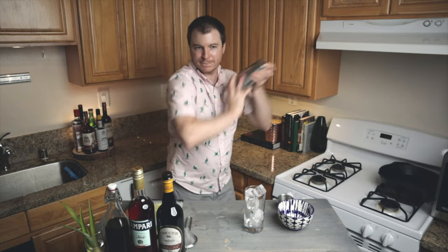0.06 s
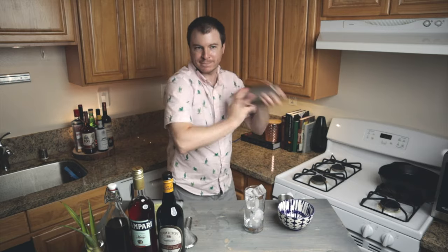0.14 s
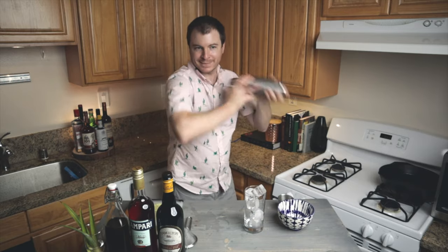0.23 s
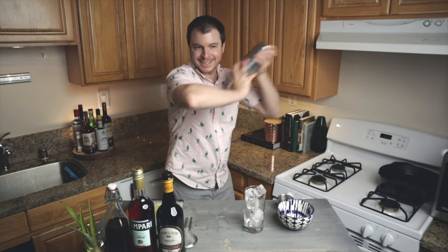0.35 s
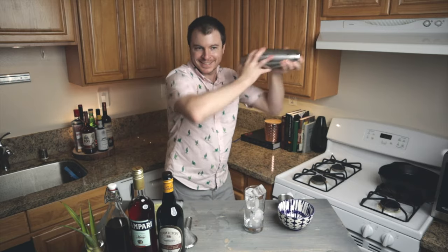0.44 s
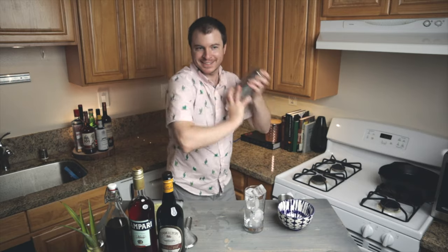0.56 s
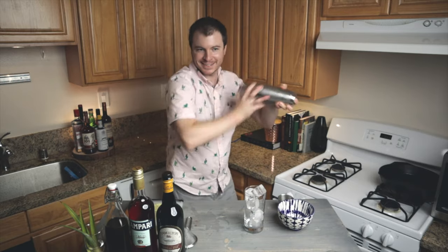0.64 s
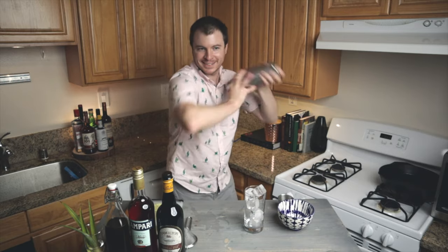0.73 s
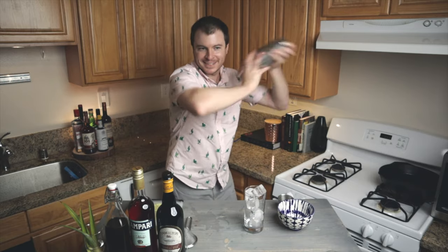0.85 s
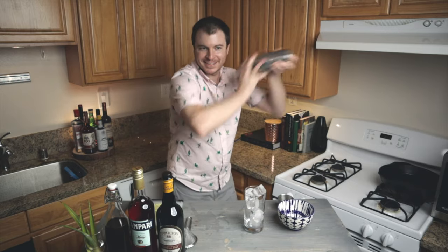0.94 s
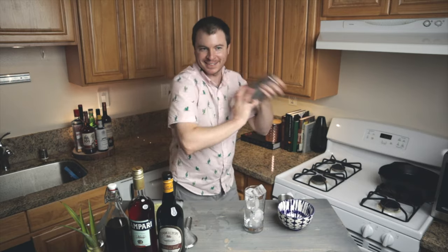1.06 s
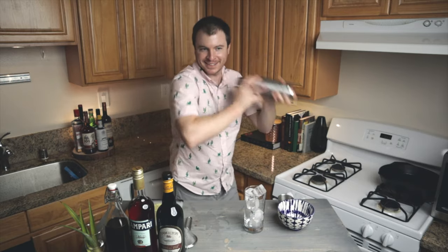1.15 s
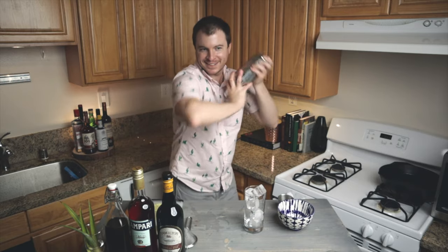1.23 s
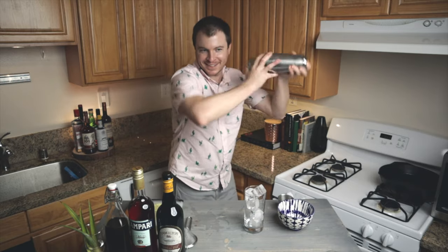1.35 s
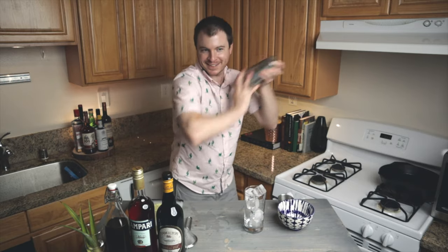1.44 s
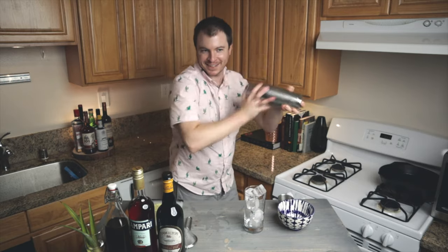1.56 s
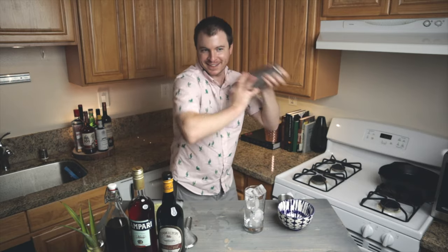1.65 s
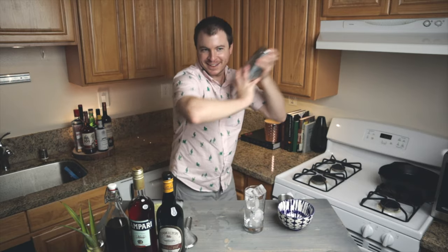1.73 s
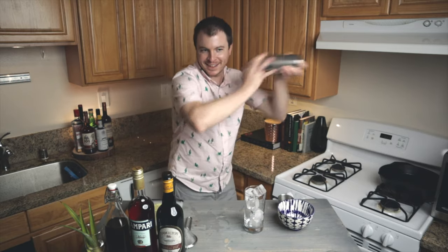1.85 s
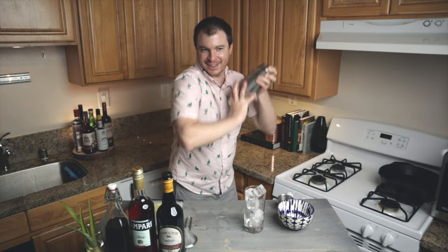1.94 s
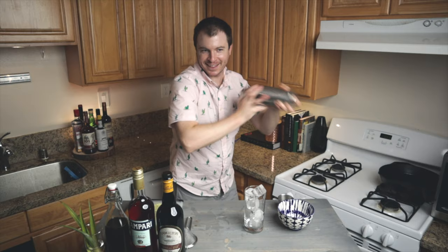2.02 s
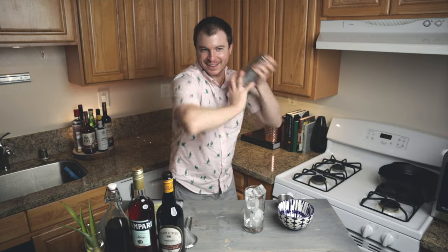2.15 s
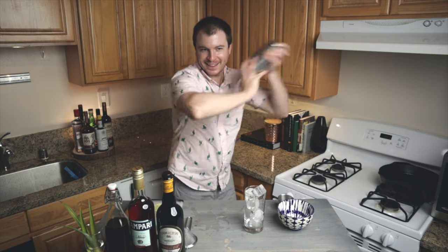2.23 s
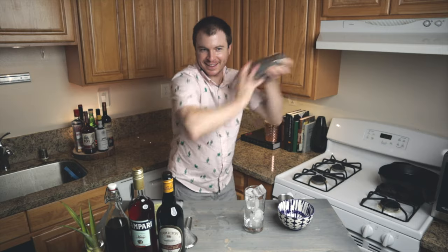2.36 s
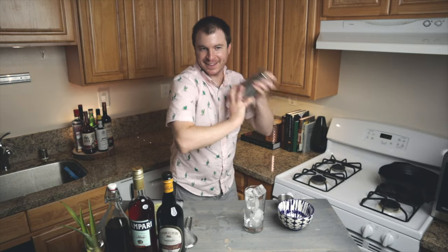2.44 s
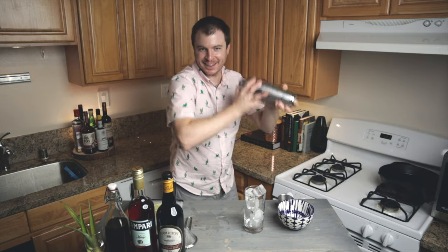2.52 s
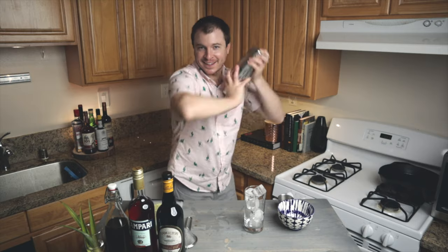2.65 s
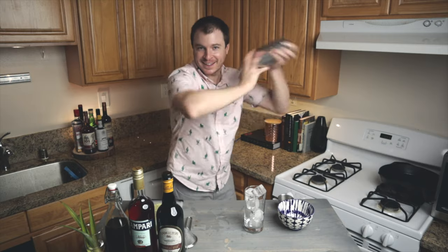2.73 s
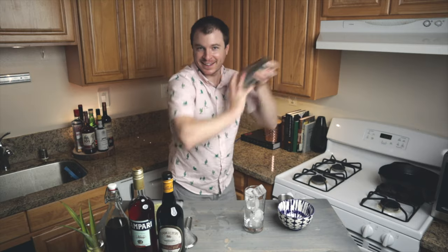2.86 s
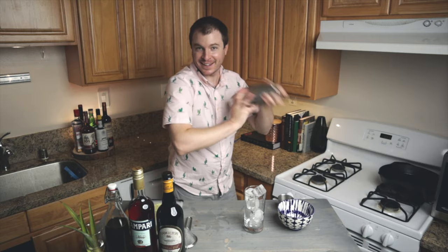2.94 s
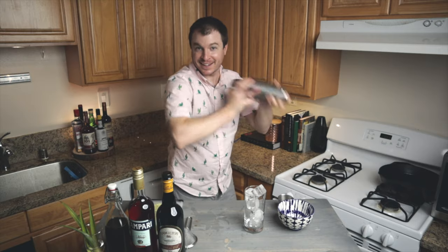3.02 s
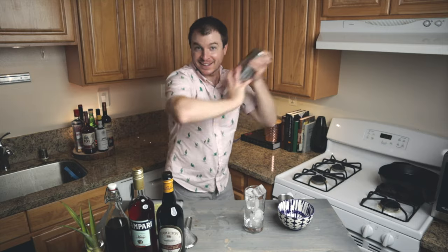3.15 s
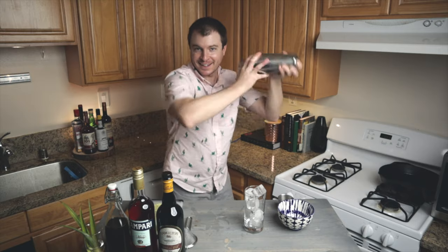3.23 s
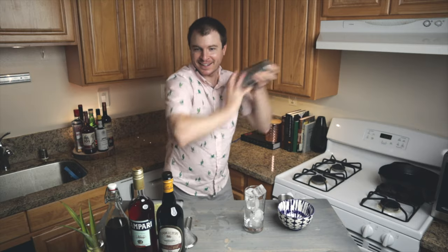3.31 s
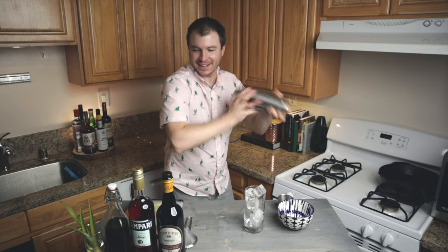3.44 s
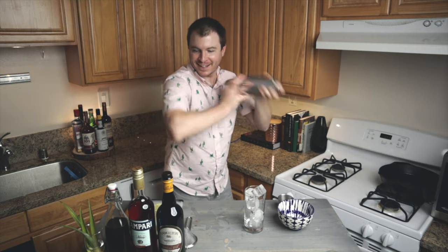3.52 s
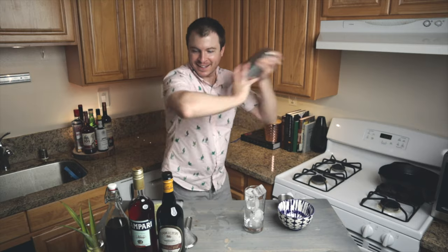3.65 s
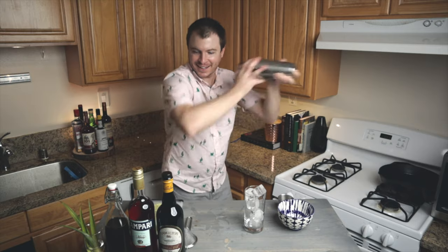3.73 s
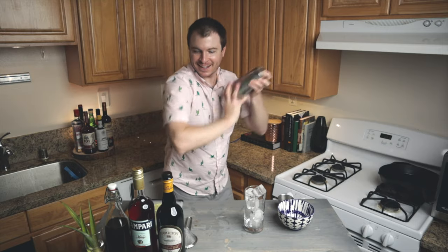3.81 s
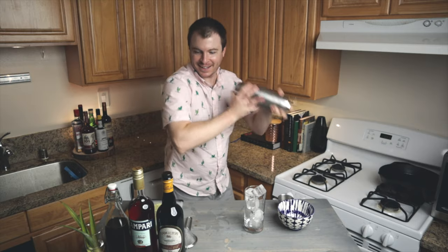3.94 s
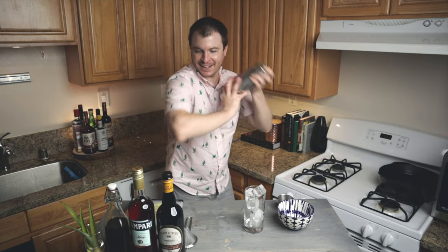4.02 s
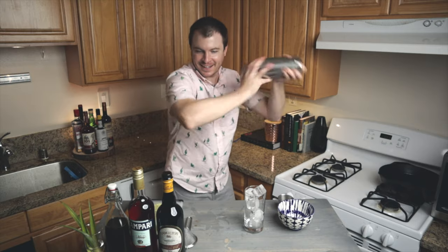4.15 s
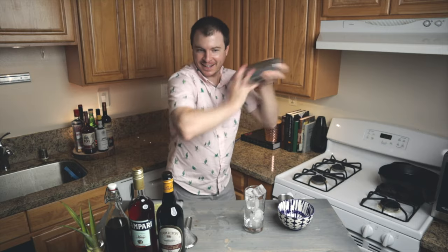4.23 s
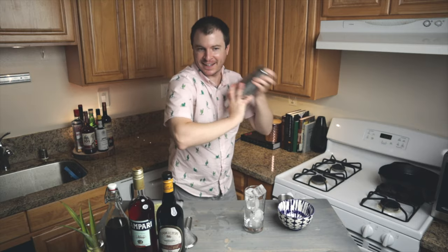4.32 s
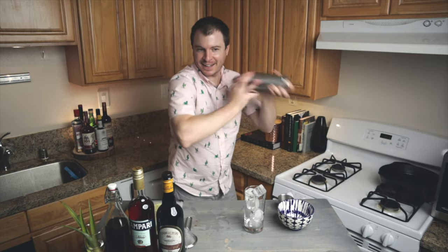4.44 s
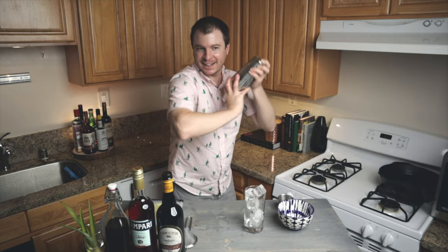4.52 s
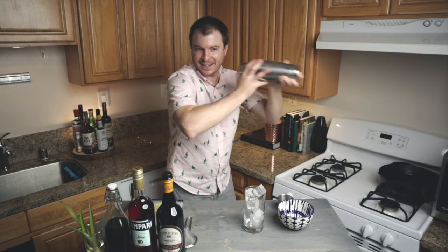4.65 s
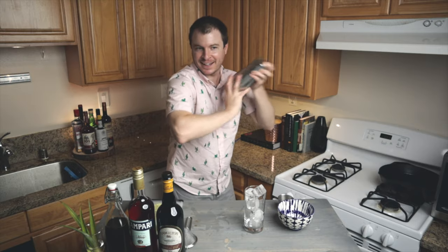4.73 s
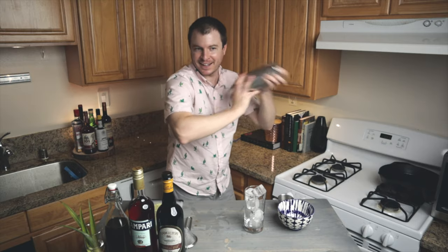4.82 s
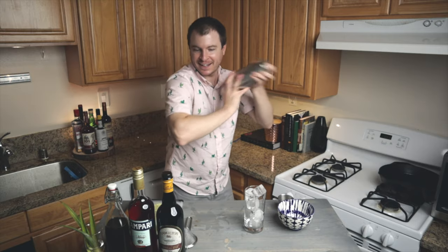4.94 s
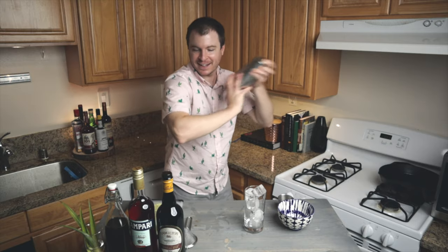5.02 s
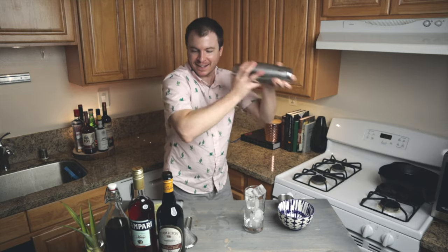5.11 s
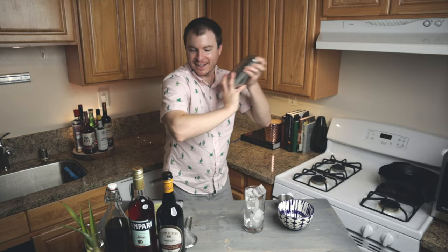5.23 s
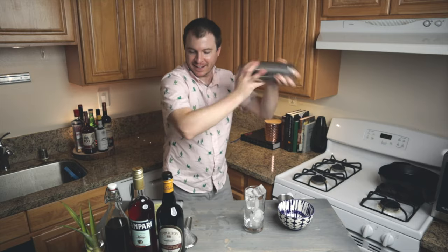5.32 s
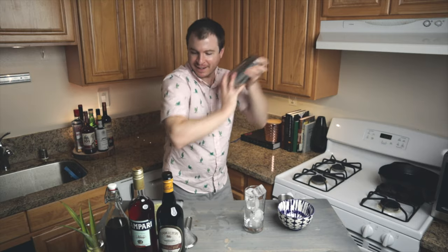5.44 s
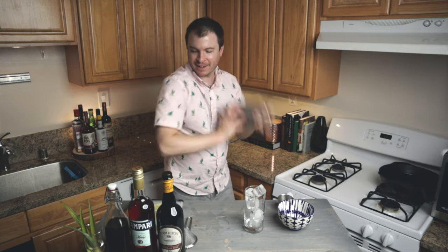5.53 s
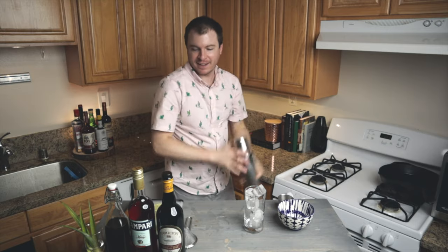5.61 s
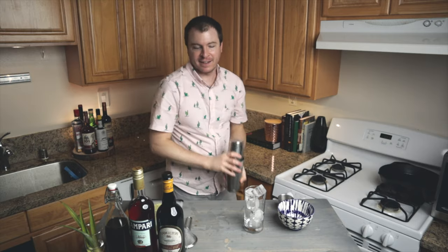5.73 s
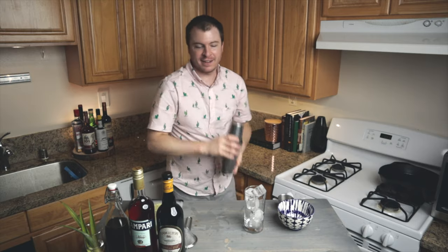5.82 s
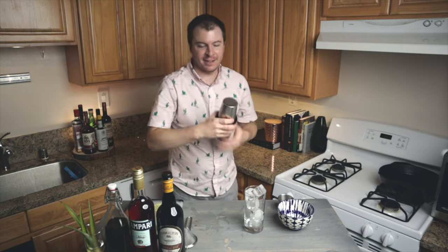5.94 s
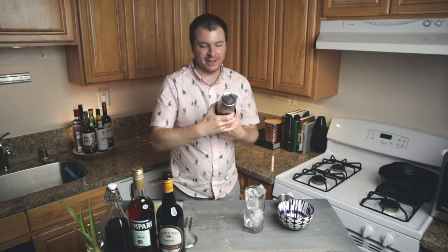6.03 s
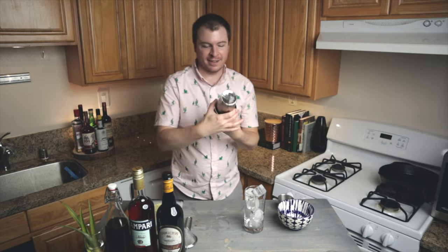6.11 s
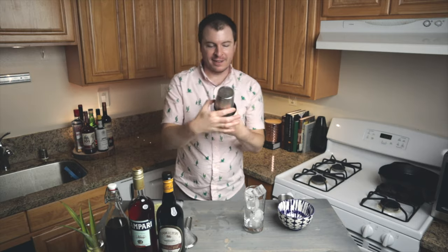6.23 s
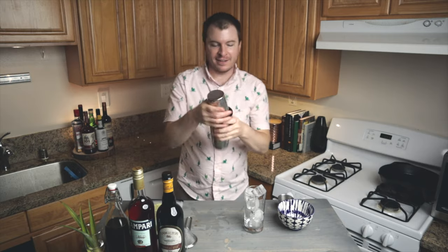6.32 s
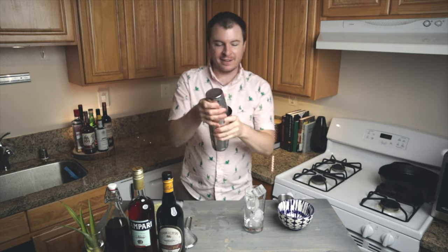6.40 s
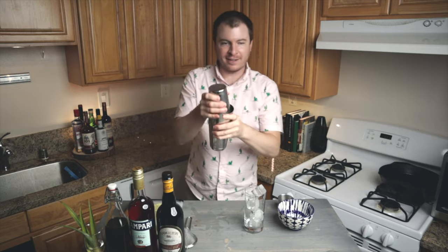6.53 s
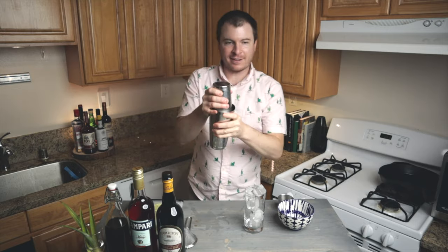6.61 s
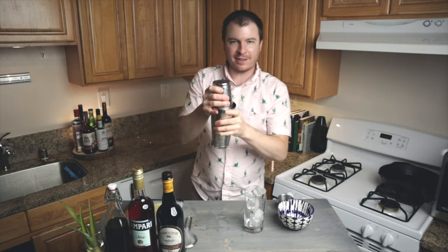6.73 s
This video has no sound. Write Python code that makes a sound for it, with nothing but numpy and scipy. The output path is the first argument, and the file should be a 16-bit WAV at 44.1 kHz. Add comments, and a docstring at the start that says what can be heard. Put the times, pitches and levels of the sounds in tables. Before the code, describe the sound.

Rapid, steady cocktail shaking: dense icy, metallic clatter with liquid slosh, softening gradually, then abruptly giving way to faint ticks over room hum.

```python
"""Quick rattling strokes of ice and liquid, thrown from end to end of a hand-held metal shaking tin.
Each landing is a shower of random collisions exciting short resonances, with a few hard cube strikes on top
that ring the modes of the wall; treble clicks and brief narrow-band swells of noise colour the rattle.
After the last stroke the ice only settles. Dense reflections of a small kitchen follow the tin;
an appliance, a sum of wavering sines, hums behind over shaped noise."""
import sys
import numpy as np
from scipy import signal
from scipy.fft import rfft, irfft, next_fast_len
from scipy.io import wavfile

SR = 44100
rng = np.random.default_rng(int(sys.argv[2]) if len(sys.argv) > 2 else 0)


def file_out(sig):
    """Save sig as 16-bit WAV at sys.argv[1]."""
    # one column per channel
    cols = np.atleast_2d(sig).T
    # limit, then scale
    lim = np.clip(cols, -1, 1)
    pcm = np.round(lim * 32767).astype(np.int16)
    wavfile.write(sys.argv[1], SR, pcm)


def gain_from_db(level_db):
    """Turn a decibel level (scalar or array-like) into a linear amplitude factor."""
    decades = np.asarray(level_db, float) / 20
    return 10 ** decades


N = 298557

# The load lands at one end; rise and fall are the times to half amplitude:
# (time [s], clack level [dB], rise [s], fall [s], thud of the liquid over clack [dB])
LANDINGS = [(.085, -11, 0.029, 0.012, -15), (.209, -10, 0.016, 0.012, -10), (.328, -13, .031, 0.021, -13),
            (.448, -11, 0.031, 0.034, -9.5), (0.554, -12.5, 0.0052, 0.024, -11.5),
            (.685, -15.5, 0.036, 0.014, -13), (0.783, -9.5, 0.01, 0.022, -10.5),
            (.92, -9.5, 0.026, 0.019, -8.5), (1.029, -13.5, 0.014, 0.022, -12.5),
            (1.144, -8.5, 0.015, 0.02, -12.5), (1.26, -10.5, 0.02, 0.016, -9.5),
            (1.388, -13.5, 0.021, 0.012, -7.5), (1.497, -16.5, .038, .03, -8),
            (1.595, -14.5, .01, 0.031, -10.5), (1.719, -15.5, 0.034, 0.032, -10.5),
            (1.854, -17.5, 0.039, 0.02, -11.5), (1.956, -17.5, 0.03, 0.05, -11),
            (2.057, -14.5, 0.023, .021, -10), (2.185, -13, 0.032, 0.039, -12.5),
            (2.3, -12, 0.022, 0.032, -11), (2.418, -16.5, 0.026, 0.028, -14),
            (2.547, -17.5, 0.036, 0.026, -8), (2.643, -15.5, 0.012, 0.033, -15),
            (2.744, -18.5, 0.018, 0.0099, -11), (2.791, -12.5, .015, 0.023, -13.5),
            (2.895, -17.5, 0.031, 0.027, -8.5), (3.015, -14, 0.016, 0.015, -7),
            (3.129, -19, 0.021, .011, -8), (3.274, -11, 0.014, .015, -10),
            (3.379, -18.5, 0.043, 0.024, -11), (3.483, -14, 0.02, 0.022, -7),
            (3.598, -17.5, 0.028, 0.025, -6.5), (3.767, -19, 0.013, 0.0088, -7.5),
            (3.846, -15.5, 0.022, 0.02, -10.5), (3.949, -18.5, .036, .029, -12),
            (4.056, -13, 0.0061, 0.028, -8), (4.187, -14.5, 0.0062, .019, -8.5),
            (4.309, -14.5, 0.034, 0.01, -10.5), (4.415, -13, 0.016, .014, -8),
            (4.532, -21, 0.022, 0.04, -7.5), (4.67, -11, 0.012, 0.015, -9.5),
            (4.776, -16, 0.018, 0.017, -21), (4.898, -20, 0.016, .008, -7), (4.999, -17, 0.014, 0.024, -15),
            (5.121, -15.5, 0.013, 0.008, -15), (5.226, -14, 0.024, 0.02, -11),
            (5.349, -16, 0.037, .014, -11.5), (5.479, -17.5, 0.023, 0.049, -12.5),
            (5.606, -20, 0.025, 0.03, -8.5), (5.756, -19, 0.026, 0.014, -15)]
# Single cubes strike the wall: (time [s], level [dB], ring frequency [Hz], thud over ring [dB])
STRIKES = [(.0797, -3, 3150, -14), (.0939, -3, 3300, -21), (.175, -2.5, 2670, -29), (.1888, -8, 3500, -16),
           (.2084, -3, 3140, -9), (.3273, -1, 3800, -16.5), (.402, -6, 3320, -14), (.4427, -2, 3550, -12.5),
           (.5274, -15, 3380, -9), (.5468, 0, 3760, -19.5), (.636, -11.5, 2470, -21),
           (.6597, -4, 3400, -33), (.6776, -2, 3330, -15), (.6886, -13.5, 2990, -4.5),
           (.7395, -10.5, 3920, -9), (.7554, -10, 3780, -13), (.776, -9, 3430, -9), (.8793, -2, 3720, -18),
           (.9187, -5, 4130, -12), (.9873, -6, 3590, -32), (1.019, -19, 3450, -1.5),
           (1.0311, -17, 3360, -16), (1.0524, -6, 3730, -20), (1.1253, -7, 3650, -11),
           (1.2127, -3, 3740, -31), (1.2297, -6, 3780, -26), (1.255, -6.5, 1810, -15),
           (1.3781, -14, 3900, -5), (1.4576, -7, 3150, -22), (1.4733, -10, 1640, -8),
           (1.4962, -10, 3760, -24), (1.5722, -5, 3520, -23), (1.5892, -8, 3560, -12),
           (1.673, -5.5, 1710, -19), (1.7127, -2.5, 3370, -30), (1.7615, -13, 3310, -13),
           (1.8302, -9, 3400, -11), (1.843, -11.5, 3370, -8), (1.8526, -10, 4050, -21),
           (1.912, -8, 3240, -18.5), (1.9523, -9, 2650, -18), (2.0634, -7, 2870, -6.5),
           (2.1392, -12, 1440, -16), (2.1727, -17, 3650, -9), (2.1881, -14, 3260, -12),
           (2.275, -14, 1800, -9), (2.2886, -5.5, 2160, -13), (2.2945, -8, 3600, -19),
           (2.3888, -10.5, 3520, -10), (2.41, -15, 2500, -6), (2.416, -7, 3700, -16),
           (2.536, -14, 3450, -13), (2.5428, -10.5, 3450, -7), (2.628, -20, 2010, -10),
           (2.6381, -10, 2520, -12.5), (2.6466, -13, 3550, -27), (2.665, -13, 3830, -11),
           (2.6818, -12, 3740, -20), (2.7163, -14, 3950, -22), (2.7711, -10, 2120, -11),
           (2.7904, -11, 3160, -7), (2.8019, -9, 4160, -28), (2.8927, -8, 3420, -10),
           (2.988, -6.5, 3500, -23), (3.0069, -7, 3350, -10.5), (3.053, -14, 3350, -28),
           (3.0943, -11, 3820, -23), (3.1182, -7, 2710, -26), (3.1317, -14.5, 1740, -6.5),
           (3.1437, -11, 1870, -26), (3.2716, -5, 2250, -24), (3.2891, -18, 2420, -19),
           (3.3437, -10, 3370, -21), (3.3727, -6.5, 2760, -22), (3.3906, -10.5, 3420, -15),
           (3.4989, -8, 4000, -17), (3.5678, -6, 3770, -25), (3.591, -4, 3300, -22),
           (3.6147, -7.5, 3400, -12), (3.7091, -14.5, 3890, -12), (3.7282, -12.5, 3520, -16),
           (3.8185, -7.5, 3930, -27), (3.8447, -13.5, 1750, -8), (3.9184, -14, 4130, -8),
           (3.9398, -6.5, 2500, -27), (3.9797, -12, 3920, -29), (4.022, -9.5, 3430, -16),
           (4.052, -3.5, 3080, -26), (4.1151, -16, 1870, -17), (4.1418, -17, 3400, -13),
           (4.1808, -4, 3400, -14.5), (4.1905, -14, 3330, -11), (4.2703, -9, 2030, -14),
           (4.2975, -19, 3460, -7), (4.3084, -10.5, 2850, -22), (4.3292, -12, 2230, -24),
           (4.3713, -6.5, 3600, -20), (4.4024, -8.5, 2360, -6.5), (4.4934, -13.5, 3380, -12),
           (4.559, -15, 2760, -15), (4.5815, -14.5, 3500, -25), (4.6637, -4.5, 1500, -12),
           (4.738, -12, 3310, -26), (4.7575, -12, 3160, -8.5), (4.774, -9, 1720, -23),
           (4.7873, -6, 3090, -30), (4.8768, -11, 3870, -15), (4.8945, -3, 3200, -18),
           (4.922, -13, 3500, -16), (4.966, -5.5, 2700, -22), (4.9894, -5, 2700, -18),
           (5.007, -7, 1970, -14.5), (5.0776, -10, 4080, -22), (5.1195, -4, 3950, -27),
           (5.1476, -12, 4300, -27), (5.2013, -9.5, 3300, -16), (5.2221, -6.5, 3100, -16),
           (5.3305, -9.5, 3000, -9), (5.3615, -10, 3500, -9), (5.4389, -8, 3300, -29),
           (5.472, -8, 2950, -15), (5.488, -13, 3480, -23), (5.4962, -7.5, 3140, -33),
           (5.5256, -11, 1770, -23), (5.6039, -23, 3840, -1), (5.6996, -12, 2110, -14),
           (5.715, -8, 2820, -28), (5.742, -10, 2850, -9), (5.7478, -7, 2860, -9.5),
           (5.7609, -4, 3200, -22), (6.016, -40, 3200, -20), (6.0414, -26, 2930, -10),
           (6.108, -30.5, 1310, -11), (6.1906, -24.5, 2980, -10), (6.2134, -26.5, 1010, -18),
           (6.272, -24, 3000, -15), (6.3269, -33, 1840, -15), (6.3696, -34, 1840, -11),
           (6.4182, -31, 1890, -14), (6.4368, -26.5, 1890, -9), (6.4557, -37, 1890, -17),
           (6.4844, -27, 1810, -9.5), (6.5092, -19.5, 1670, -17), (6.5447, -28, 3150, -13),
           (6.587, -32, 3170, -19), (6.5986, -34, 3610, -12), (6.6398, -35, 3130, -12)]
# Ice slides and liquid sloshes between landings, then settles: (time [s], clack level [dB])
SLIDING = [(0, -13), (.04, -20.5), (1, -25.5), (1.5, -24), (2.5, -38.5), (3, -25), (5, -26), (5.5, -30),
           (5.66, -44), (5.71, -26.5), (5.88, -33.5), (5.97, -55), (6.1, -44.5), (6.2, -46), (6.46, -44.5),
           (6.53, -38.5), (6.6, -41.5), (6.69, -38), (6.77, -47.5)]
# Treble clicks of the ice, alone or as the bright edge of a strike: (time [s], level [dB])
TREBLE_CLICKS = [(0.0618, -22), (0.0787, -10), (0.174, -13.5), (0.199, -10), (0.2897, -18), (0.291, -17),
                 (0.3274, -7.5), (0.4005, -16), (0.4409, -19), (0.5272, -13), (0.545, -11), (0.627, -21),
                 (0.6754, -16), (0.7547, -19), (0.776, -15), (0.8774, -25), (0.9033, -24), (0.9148, -13),
                 (1.0226, -29), (1.051, -19), (1.1251, -14), (1.2121, -24), (1.2471, -23), (1.3384, -26),
                 (1.3813, -19), (1.4561, -23), (1.4735, -23), (1.486, -17), (1.5684, -14), (1.6726, -21),
                 (1.712, -13.5), (1.8058, -19), (1.8188, -17), (1.8427, -16), (1.8514, -12), (2.0273, -24),
                 (2.1725, -17), (2.2434, -18), (2.2882, -14.5), (2.4987, -20), (2.5164, -18), (2.5965, -23),
                 (2.641, -19), (2.7314, -15.5), (2.7716, -7.5), (2.8768, -12), (2.9642, -22), (2.9866, -23),
                 (3.0934, -19), (3.1312, -13.5), (3.2652, -9.5), (3.3712, -20), (3.4635, -18),
                 (3.6257, -18), (3.684, -14.5), (3.916, -19), (4.0225, -18), (4.0492, -20), (4.13, -18.5),
                 (4.1789, -21), (4.2563, -12.5), (4.37, -17), (4.4019, -34), (4.5316, -20), (4.597, -22),
                 (4.6149, -15.5), (4.658, -18), (4.9506, -16.5), (4.9644, -19), (4.9904, -12.5),
                 (5.0774, -15), (5.1174, -13), (5.1851, -21), (5.201, -17), (5.222, -8), (5.3212, -10),
                 (5.427, -15.5), (5.7149, -21), (5.7474, -15), (5.7826, -17.5)]
# Brief narrow-band swells of noise in the rattle:
# (time [s], frequency [Hz], rms level [dB], swell time constant [s])
PITCHED_SWELLS = [(0.332, 596, -20, 0.013), (0.467, 528, -22.5, 0.019), (0.695, 588, -29, 0.022),
                  (0.81, 1760, -19, 0.016), (0.996, 2060, -24, 0.012), (1.028, 553, -35, .02),
                  (1.273, 1830, -22, 0.028), (1.5, 530, -32.5, .02), (1.591, 893, -25, .02),
                  (2.191, 518, -30, 0.022), (2.196, 1770, -27, .02), (2.539, 606, -38, 0.014),
                  (2.673, 447, -27.5, 0.011), (2.8, 487, -30, 0.013), (3.143, 1780, -27, 0.023),
                  (3.599, 517, -27, 0.011), (3.848, 1740, -17.5, 0.017), (3.945, 1800, -34, 0.013),
                  (4.11, 1910, -30, 0.012), (4.193, 530, -26, 0.011), (4.408, 405, -24, 0.011),
                  (4.675, 1450, -26, 0.016), (4.774, 1740, -19.5, 0.013), (5.354, 430, -29.5, 0.014),
                  (5.347, 686, -28, 0.021), (5.489, 1900, -26, 0.022), (5.612, 604, -30, 0.023),
                  (5.688, 2000, -26.5, 0.011), (6.123, 1330, -51, .02), (6.113, 3500, -39, 0.016),
                  (6.16, 3880, -52, .04), (6.3, 4040, -44, .04), (6.624, 3300, -52, .05),
                  (6.212, 3150, -48, 0.021), (6.347, 2030, -55, .03), (6.448, 1890, -36.5, 0.025),
                  (6.517, 1860, -35, 0.031), (6.552, 3100, -37, 0.022), (6.678, 940, -45, 0.016)]
# Colour of the hand-damped tin: (frequency [Hz], relative spectral density [dB per Hz])
TIN_COLOUR = [(250, -22.5), (330, -16.5), (420, -15), (540, -4.5), (650, -7), (780, -4), (990, -5),
              (1800, -2.5), (2400, -2), (3430, 1.5), (4150, -0.5), (4950, -10), (8500, -16), (10500, -23.5),
              (12800, -20), (15500, -30.5)]
# Resonant modes of the wall: (frequency [Hz], relative level [dB], 60 dB decay time [s])
WALL_MODES = [(430, -5.5, 0.026), (555, -5.5, 0.082), (820, 0, 0.034), (1330, 4, 0.05), (1837, -2, 0.083),
              (2304, 2.5, 0.039), (2850, -4.5, 0.044), (3150, -5.5, 0.027), (3570, -4, 0.061),
              (4050, -10, 0.085)]
# Reverberation of the kitchen: (frequency [Hz], 60 dB decay time [s])
KITCHEN_DECAY = [(300, 0.36), (1000, 0.52), (3000, 0.21), (8000, 0.78), (16000, 0.61)]
# Motor and mains lines: (frequency [Hz], relative level [dB])
HUM_LINES = [(54, -8.5), (80.7, -4), (119.5, -3.5), (161.5, -6.5), (242.2, -10.5), (323, -3)]
# Level of the hum as the recorder's automatic gain rides it: (time [s], level [dB])
HUM_LEVEL = [(0, -47), (2, -49), (4.5, -54.5), (5.9, -54), (6.77, -45.5)]
# Broad noise of the room: (frequency [Hz], relative spectral density [dB per Hz])
AIR_COLOUR = [(30, -24), (50, 2.5), (150, 2.5), (300, 2), (500, -1.5), (1300, -28), (2200, -37),
              (3700, -15), (5000, -24), (16000, -22)]

AIR_DB = -48.5                                    # rms
THUD_TOP_HZ, TREBLE_FOOT_HZ = 1150, 5500          # borders of the three registers
LANDING_TREBLE_DB = -15                           # over the clack of a landing, at time 0
SHATTER_DB_PER_S = 0.42                           # the landings brighten as the cubes break up
STRIKE_TREBLE_DB, STRIKE_MODES_DB = -17.5, -14    # over the ring of a strike
SLIDE_THUD_DB, SLIDE_TREBLE_DB = -9, -13          # over the clack of the sliding


def rattle(per_s, spread_db, cycles, patchy_db, crack_db, crack_spread_db):
    """Modal excitation: collisions, strikes and treble clicks drive short resonances across the tin's colour."""
    strength = load_motion(thud_lag_s=0.0023) * clumps(per_s=70, depth=0.78, die_s=0.0066)

    pitches = np.geomspace(280, 15500, 42)
    registers = np.array([register(hz) for hz in pitches])
    # Density times bandwidth: the width of a resonance grows with its frequency.
    share = gain_from_db(at_hz(TIN_COLOUR, pitches)) * np.sqrt(pitches)
    share = share / [np.linalg.norm(share[registers == k]) for k in registers]

    born = np.flatnonzero(rng.random(N) < per_s / SR)
    sizes = gain_from_db(spread_db * np.minimum(rng.exponential(1, N), 4.2))[born]

    strike_s, strike_db, _, thud_db = np.transpose(STRIKES)
    strike_at = np.round(strike_s * SR).astype(int)
    cracks_db = [strike_db + thud_db, strike_db + crack_db, strike_db + STRIKE_TREBLE_DB]
    treble_s, treble_db = np.transpose(TREBLE_CLICKS)
    treble_at = np.round(treble_s * SR).astype(int)

    out = np.zeros(N)
    for hz, part, k in zip(pitches, share, registers):
        response = resonate(np.arange(4096) == 0, hz, cycles)
        peak = np.max(np.abs(response))

        clicks = np.zeros(N)
        clicks[born] = sizes * rng.standard_normal(len(born))
        patches = gain_from_db(patchy_db * drift(25))    # the colour shifts as cubes change place
        clicks = rms_one(clicks * patches) * strength[k] / np.linalg.norm(response)

        clicks[strike_at] += random_cracks(cracks_db[k], crack_spread_db) / peak
        if k == 2:
            clicks[treble_at] += random_cracks(treble_db, crack_spread_db) / peak
        out += resonate(part * clicks, hz, cycles)
    return out


def random_cracks(level_db, spread_db):
    """Impulsive excitation: impulses of scattered level and random sign."""
    heights = gain_from_db(level_db + spread_db * rng.standard_normal(len(level_db)))
    return heights * np.sign(rng.standard_normal(len(level_db)))


def load_motion(thud_lag_s):
    """Power addition: landings swell and die over the sliding, giving collision strength per register."""
    t = np.arange(N) / SR
    sliding_db = np.interp(t, *np.transpose(SLIDING))
    power = gain_from_db(2 * (sliding_db + [[SLIDE_THUD_DB], [0], [SLIDE_TREBLE_DB]]))
    for s, db, rise, fall, thud_db in LANDINGS:
        near = slice(max(round((s - .15) * SR), 0), round((s + .25) * SR))
        treble_db = LANDING_TREBLE_DB + SHATTER_DB_PER_S * s
        for k, over_db in enumerate((thud_db, 0, treble_db)):
            lag = thud_lag_s if k == 0 else 0   # the heavy liquid arrives a little late
            since = t[near] - s - lag
            swelling = (since / max(rise, .002)) ** 2
            dying = (np.abs(since) / max(fall, .002)) ** 0.92
            halvings = np.where(since < 0, swelling, dying)
            power[k, near] += gain_from_db(2 * (db + over_db)) * .25 ** halvings    # a quarter power is half amplitude
    power += aftershocks(shower_db=-10.5, shower_s=0.0092, treble_db=-11.5, treble_s=0.0095)
    return np.sqrt(power)


def aftershocks(shower_db, shower_s, treble_db, treble_s):
    """Exponential relaxation: each strike or treble click adds a shower of collisions whose power dies away."""
    jolts = np.zeros((3, N))
    s, db, _, thud_db = np.transpose(STRIKES)
    registers_db = db + np.array([thud_db, 0 * db, 0 * db + STRIKE_TREBLE_DB])
    jolts[:, np.round(s * SR).astype(int)] = gain_from_db(2 * (shower_db + registers_db))
    s, db = np.transpose(TREBLE_CLICKS)
    jolts[2, np.round(s * SR).astype(int)] += gain_from_db(2 * (db + treble_db))
    return np.array([die_away(jolt, length)
                     for jolt, length in zip(jolts, (shower_s, shower_s, treble_s))])


def clumps(per_s, depth, die_s):
    """Shot noise: smaller cubes land unevenly, so the strength jumps at random moments and sinks again."""
    jumps = (rng.random(N) < per_s / SR) * rng.random(N)
    return rms_one(1 + depth * die_away(jumps, die_s))


def strikes(clack_s, nearness_db, boom_db):
    """Modal coupling: a strike clacks at its own pitch and rings the nearest wall modes, its thud the low ones."""
    s, db, hz, thud_db = np.transpose(STRIKES)
    at = np.round(s * SR).astype(int)
    t = np.arange(512) / SR
    envelope = t / clack_s * np.exp(1 - t / clack_s)
    clack = envelope * np.sin(2 * np.pi * hz[:, None] * t)
    out = np.zeros(N)
    np.add.at(out, at[:, None] + np.arange(512), gain_from_db(db - 4)[:, None] * clack)

    for mode_hz, level_db, t60 in WALL_MODES:
        if register(mode_hz) == 0:
            coupling_db = thud_db + boom_db
        else:
            octaves_away = np.abs(np.log2(hz / mode_hz))
            coupling_db = STRIKE_MODES_DB - nearness_db * octaves_away
        chance_db = 4 * rng.standard_normal(len(STRIKES))
        clicks = np.zeros(N)
        clicks[at] = gain_from_db(db + level_db + coupling_db + chance_db)
        out += ring(clicks, mode_hz, t60)
    return out


def pitched_swells(fall_ratio, cycles=22):
    """Narrow-band noise: each swell is noise through one resonance; fall_ratio is fade time over swell time."""
    before, after = 4096, 8192    # samples around the peak
    t = np.arange(-before, after) / SR
    out = np.zeros(N + after)
    for s, hz, db, swell_s in PITCHED_SWELLS:
        envelope = np.exp(-(t / np.where(t < 0, swell_s, fall_ratio * swell_s)) ** 2)
        noise = rng.standard_normal(len(t))
        at = round(s * SR)
        out[at - before:at + after] += gain_from_db(db) * envelope * rms_one(resonate(noise, hz, cycles))
    return out[:N]


def kitchen(x, first_s):
    """Diffuse reverberation: octave bands of noise, each dying at its own rate, convolved with the source."""
    t = np.arange(SR) / SR
    tail = np.zeros(SR)
    for low in 125 * 2. ** np.arange(7):
        octave = signal.butter(2, [low, 2 * low], "band", fs=SR, output="sos")
        band = signal.sosfilt(octave, rng.standard_normal(SR))
        tail += band * gain_from_db(-60 * t / at_hz(KITCHEN_DECAY, low * np.sqrt(2)))
    tail *= np.clip(t / first_s - 1, 0, 1)    # silent until first_s, full at twice that
    return signal.fftconvolve(x, tail / np.sqrt(np.sum(tail ** 2)))[:N]


def room_tone(waver_db, wander_hz):
    """Superposition: wavering sine lines follow the recorder's gain over the shaped noise of the room."""
    lines = np.zeros(N)
    for hz, db in HUM_LINES:
        phase = 2 * np.pi * (np.cumsum(hz + wander_hz * drift(5)) / SR + rng.random())
        lines += gain_from_db(db + waver_db * drift(6)) * np.sin(phase)
    level_db = np.interp(np.arange(N) / SR, *np.transpose(HUM_LEVEL))
    hum = gain_from_db(level_db) * rms_one(lines)

    size = next_fast_len(N)
    hz = np.maximum(np.arange(size // 2 + 1) * SR / size, 1)
    spectrum = rfft(rng.standard_normal(size)) * gain_from_db(at_hz(AIR_COLOUR, hz))
    air = gain_from_db(AIR_DB) * rms_one(irfft(spectrum, size)[:N])
    return hum + air


def register(hz):
    """Division of the spectrum: 0 thud of load and liquid, 1 clack of the wall, 2 treble of the ice."""
    return int(hz > THUD_TOP_HZ) + int(hz > TREBLE_FOOT_HZ)


def resonate(x, hz, cycles):
    """Cascaded resonance: two equal band-passes, each decaying 60 dB in so many cycles, have steep skirts."""
    r = gain_from_db(-60 * hz / (cycles * SR))
    section = [1 - r, 0, r - 1, 1, -2 * r * np.cos(2 * np.pi * hz / SR), r * r]
    return signal.sosfilt([section, section], x + 1e-18)


def ring(clicks, hz, t60):
    """Damped free oscillation: a unit click starts a sine of initial height 1."""
    r, w = gain_from_db(-60 / (t60 * SR)), 2 * np.pi * hz / SR
    return signal.lfilter([0, np.sin(w)], [1, -2 * r * np.cos(w), r * r], clicks + 1e-18)


def die_away(jumps, length_s):
    """First-order relaxation: every jump decays by a factor e in length_s."""
    return signal.lfilter([1], [1, -np.exp(-1 / (length_s * SR))], jumps + 1e-18)


def drift(rate):
    """Slow random modulation: straight lines between normal values of spread 1, rate of them a second."""
    steps = rng.standard_normal(N // 64 + 2)
    return np.interp(np.arange(N) * rate / SR, np.arange(len(steps)), steps)


def rms_one(x):
    """Energy normalisation: scales to unit rms."""
    return x / np.sqrt(np.mean(x ** 2) + 1e-20)


def at_hz(points, hz):
    """Logarithmic frequency scale: reads a (frequency [Hz], value) table between its points."""
    table = np.array(points)
    return np.interp(np.log(hz), np.log(table[:, 0]), table[:, 1])


def bell(x, hz, q, db):
    """Second-order equalisation: a peak or dip in the response."""
    w, a = 2 * np.pi * hz / SR, gain_from_db(db / 2)
    k = np.sin(w) / (2 * q)
    numerator = [1 + k * a, -2 * np.cos(w), 1 - k * a]
    denominator = [1 + k / a, -2 * np.cos(w), 1 - k / a]
    return signal.lfilter(numerator, denominator, x)


def scene():
    """Direct and reverberant field: the tin, too small to radiate bass, its duller reflections and the room."""
    tin = gain_from_db(-1.5) * rattle(per_s=4500, spread_db=2.5, cycles=9.6, patchy_db=2.5,
                             crack_db=-4, crack_spread_db=3.0)
    tin = tin + strikes(clack_s=0.00097, nearness_db=21, boom_db=-9)
    tin = tin + pitched_swells(fall_ratio=0.75)
    tin = signal.sosfilt(signal.butter(4, 260, "high", fs=SR, output="sos"), tin)
    walls = signal.lfilter(*signal.butter(1, 6000, fs=SR), kitchen(tin, first_s=0.006))
    mix = tin + gain_from_db(-7.5) * walls + room_tone(waver_db=5.0, wander_hz=1.605)
    return mix[None]    # one channel


def roll_off(x):
    """The treble ends steeply here."""
    return signal.sosfilt(signal.butter(12, 16280, fs=SR, output="sos"), x)


def record(dry):
    """Microphone response: a narrow lift beside a broader dip in the presence range, clipped at full scale."""
    lifted = bell(dry, hz=4150, q=8.6, db=2.0)
    coloured = bell(lifted, hz=4750, q=3.1, db=-4.5)
    return roll_off(np.clip(coloured, -1, 1))


dry = scene()
out = record(dry)
file_out(out)
```